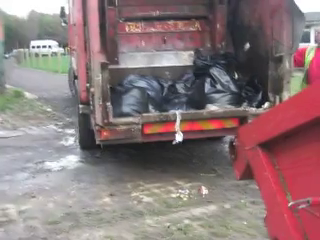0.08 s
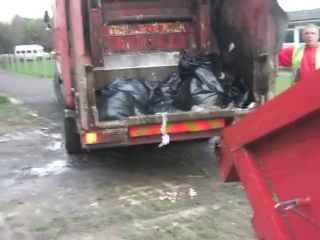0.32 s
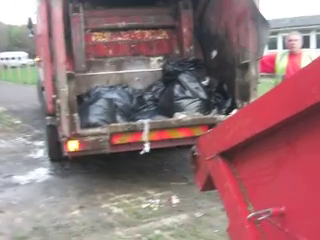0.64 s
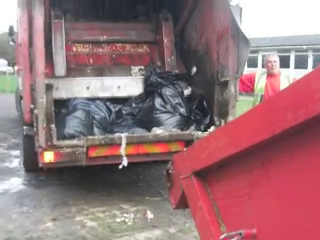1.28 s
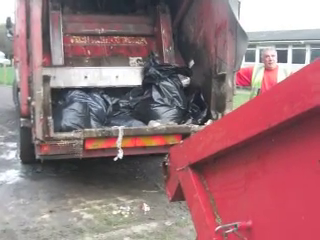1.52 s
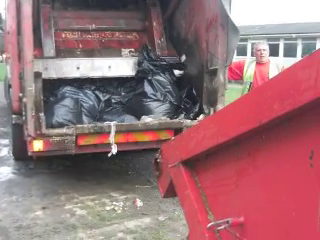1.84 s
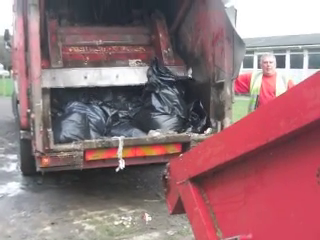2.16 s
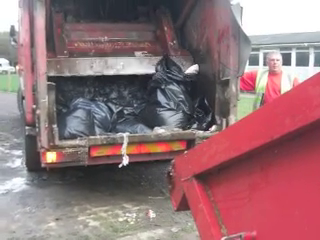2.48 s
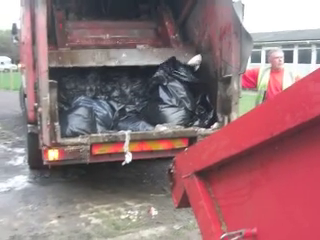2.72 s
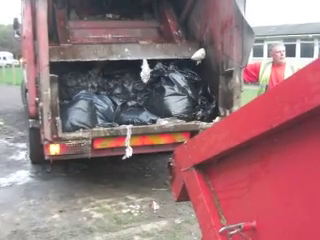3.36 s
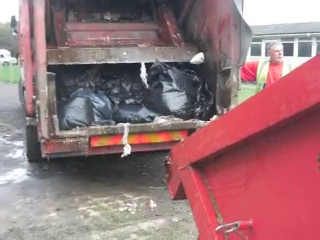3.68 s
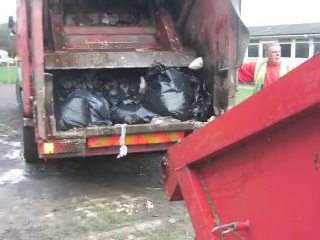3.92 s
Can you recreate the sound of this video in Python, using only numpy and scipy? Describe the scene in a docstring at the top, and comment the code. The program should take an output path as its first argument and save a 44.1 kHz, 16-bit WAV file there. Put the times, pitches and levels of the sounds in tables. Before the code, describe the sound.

A garbage truck runs close by outdoors, its diesel clattering under a wavering hydraulic whine. Near the end the compactor crushes rubbish bags with a quick cluster of crunches, metal bangs and scrapes, then a hiss rises.

```python
"""A refuse truck fades in outdoors: its diesel clatters at raised idle over a low rumble and
drives the whining hydraulic pump of the compactor. Near three seconds the packer blade crushes
through the load: the body shudders, the bags crunch, the steel hopper bangs and the blade scrapes.
The loudest bang overloads and ducks the level, which then creeps back up.
In the last half second oil hisses louder through the valves while engine and pump run on."""
import sys
import numpy as np
from scipy import signal
from scipy.fft import rfft, irfft
from scipy.io import wavfile
from scipy.ndimage import uniform_filter1d

SR = 44100
rng = np.random.default_rng(int(sys.argv[2]) if len(sys.argv) > 2 else 0)


def generate_wav(sig):
    """Save sig (samples, or channels by samples) to the path in sys.argv[1] as 16-bit PCM at SR."""
    pcm = np.round(np.clip(np.atleast_2d(sig).T, -1, 1) * 32767).astype(np.int16)
    wavfile.write(sys.argv[1], SR, pcm)


N = 176400
T = np.arange(N) / SR


def from_db(db):
    """Decibels to gain."""
    return 10 ** (np.asarray(db) / 20)


def rms_one(x):
    """Scale to rms 1."""
    return x / np.sqrt(np.mean(x ** 2) + 1e-20)


def in_time(rows):
    """Breakpoints to automation curves, one for each column after the time."""
    times, *columns = np.transpose(rows)
    return [np.interp(T, times, column) for column in columns]


def colour(noise, points):
    """EQ a noise through (f/Hz, level/dB) points, then scale to rms 1."""
    hz, db = np.transpose(points)
    bins = np.maximum(np.arange(N // 2 + 1) * SR / N, 1)
    eq = from_db(np.interp(np.log(bins), np.log(hz), db))
    return rms_one(irfft(rfft(noise) * eq, N))


def drift(rate_hz):
    """Smooth random modulation of rms about 1, rolling off above rate_hz."""
    size = N // 25 + 1
    bins = np.arange(size // 2 + 1) * SR / N
    slow = irfft(rfft(rng.standard_normal(size)) / (1 + (bins / rate_hz) ** 2), size)
    return np.interp(T, np.linspace(0, N / SR, size), rms_one(slow))


def ring(x, hz, t60):
    """One resonant mode: a unit click sets a sine of height 1 ringing."""
    radius = np.exp(-np.log(1000) / (t60 * SR))
    angle = 2 * np.pi * hz / SR
    return signal.lfilter([0, np.sin(angle)], [1, -2 * radius * np.cos(angle), radius ** 2], x + 1e-18)


def tone(turns, multiple, jitter_rad):
    """A harmonic of a rotation, rms 1, with an unsteady phase."""
    phase = 2 * np.pi * (multiple * turns + rng.random())
    return np.sqrt(2) * np.sin(phase + jitter_rad * drift(20))


def rumble():
    """The low bed: truck and load vibrate irregularly, swelling as the load gives way."""
    # rumble swell: t/s, level/dB
    swell = [(.14, -33.5), (2.96, -33.5), (3.0, -21), (3.09, -17), (3.19, -19.5), (3.26, -19.5),
             (3.4, -28.5), (4.0, -28.5)]
    # rumble colour: f/Hz, relative level/dB
    spectrum = [(20, -20), (45, 5.5), (80, -0.5), (280, -2), (600, -6), (2000, -38.5)]
    return from_db(in_time(swell)[0]) * colour(rng.standard_normal(N), spectrum)


def engine(cycles):
    """Diesel clatter comes round on every four-stroke cycle, with fresh noise, over the firing drone."""
    # drone partials: multiple of the cycle, level/dB
    partials = [(5, -46), (6, -33.5), (9, -46), (12, -38.5), (15, -43.5), (18, -44.5), (20, -46.5),
                (22, -45), (57, -50.5), (88, -49), (93, -45), (117, -50.5), (171, -47.5)]
    # clatter colour: f/Hz, relative level/dB
    spectrum = [(120, -23), (220, -2), (320, -5.5), (420, -17), (500, -4), (700, -4.5), (860, -5.5),
                (1000, -4.5), (1400, -4.5), (1900, -3), (2300, -9), (2950, -11.5), (3400, -7.5),
                (3750, -12.5), (4900, -18), (5600, -24.5)]
    # the clatter throbs with the turning parts: multiple of the cycle, depth/dB
    throbs = [(1, 0.27), (4, 0.82), (16, 1.0), (28, 0.8)]
    clatter_db, repeat_share = -26.5, 0.54
    cycle_samples = int(N / cycles[-1])
    fresh, pattern = rng.standard_normal((2, N))
    looped = np.interp(cycles % 1 * cycle_samples, np.arange(N), pattern)
    noise = np.sqrt(repeat_share) * looped + np.sqrt(1 - repeat_share) * fresh
    throb_db = sum(db * tone(cycles, k, jitter_rad=0.091) for k, db in throbs) / np.sqrt(2)
    drone = sum(from_db(db) * tone(cycles, k, jitter_rad=0.17) for k, db in partials)
    return from_db(clatter_db) * colour(noise * from_db(throb_db), spectrum) + drone


def pump(turns):
    """Pressure ripple in the pump makes a wavering harmonic whine and a high whistle."""
    # whine harmonics: t/s, then level/dB of harmonics 1, 2, 3, 6 and 12
    whine_levels = [(0.139, -23, -30.5, -46, -45, -55.5), (.4, -23, -35, -41.5, -31.5, -55),
                    (.62, -23.5, -31.5, -37, -31.5, -56), (.85, -23.5, -35, -35, -41.5, -51),
                    (1.1, -22.5, -31, -40.5, -43, -46), (1.75, -24.5, -31, -49, -42.5, -44.5),
                    (2.6, -25.5, -34, -44.5, -33.5, -45.5), (2.98, -24.5, -32, -38, -37, -49.5),
                    (3.45, -28, -41, -38.5, -39.5, -47), (3.8, -29, -32, -40.5, -42, -47)]
    # the whistle comes and goes: t/s, level/dB
    whistle_level = [(.25, -50), (.35, -36), (.45, -49.5), (1.15, -42), (1.45, -52), (3.35, -49.5),
                     (3.56, -37.5), (3.75, -51.5), (3.92, -37.5)]
    whine = np.zeros(N)
    for k, db in zip((1, 2, 3, 6, 12), in_time(whine_levels)):
        waver_db = np.sqrt(k) * drift(3.7)
        whine += from_db(db + waver_db) * tone(turns, k, jitter_rad=0.086 * k)
    whistle = from_db(in_time(whistle_level)[0]) * tone(turns, multiple=15, jitter_rad=.6)
    return whine + whistle


def oil_hiss():
    """Oil hisses through the valves, louder after the crush."""
    # hiss swell: t/s, level/dB
    swell = [(.14, -42), (2.9, -46.5), (3.3, -47.5), (3.55, -34.5), (4.0, -31.5)]
    # hiss colour: f/Hz, relative level/dB
    spectrum = [(500, -26), (1500, -10.5), (2600, -6.5), (3400, 4.5), (4000, -4.5), (4700, -1.5),
                (5700, -18)]
    return from_db(in_time(swell)[0]) * colour(rng.standard_normal(N), spectrum)


def hopper_echo(x):
    """The open steel hopper adds a short diffuse tail to the dry sound."""
    wet_db, t60 = -9, 0.68
    tail = rng.standard_normal(N) * np.exp(-np.log(1000) * T / t60)
    tail /= np.sqrt(np.sum(tail ** 2))
    return x + from_db(wet_db) * signal.fftconvolve(x, tail)[:N]


def shudder():
    """Jolts shake the low modes of the truck's body; a longer contact gives a softer thud."""
    # jolts: t/s, level/dB, contact time/s
    jolts = [(2.986, -15.5, 0.0025), (3.052, -23.5, .001), (3.125, -21, .0018), (3.229, -19, 0.00046),
             (3.294, -19.5, 0.0026), (3.371, -22.5, 0.0012)]
    # body modes: f/Hz, gain/dB, t60/s
    modes = [(44.5, 3, 0.24), (74.4, -3, .14), (103.2, 4.5, 0.15), (190, 3.5, .1), (288, 9.5, 0.21)]
    force = np.zeros(N)
    for start, db, contact in jolts:
        force += from_db(db) * (T >= start) * np.exp(-np.abs(T - start) / contact) / (contact * SR)
    return sum((-1) ** k * from_db(db) * ring(force, hz, t60) for k, (hz, db, t60) in enumerate(modes))


def scrapes():
    """The blade rubs on steel: each stroke swells and dies in one narrow resonance."""
    # blade strokes: t/s, length/s, level/dB, f/Hz, bandwidth/Hz
    strokes = [(3.075, .042, -21, 4650, 258), (3.198, 0.14, -28.5, 2610, 260),
               (3.246, 0.046, -29, 4760, 297)]
    out = np.zeros(N)
    for start, length, db, hz, bandwidth in strokes:
        swell = np.sin(np.pi * np.clip((T - start) / length, 0, 1))
        t60 = np.log(1000) / (np.pi * bandwidth)
        out += from_db(db) * swell * rms_one(ring(rng.standard_normal(N), hz, t60))
    return out


def bangs():
    """Each blow crunches the bags and sets the steel hopper ringing; loose plates rattle its modes."""
    # blows: t/s, crunch level/dB, ring level/dB, attack/s, decay time constant/s, tilt/(dB per octave)
    blows = [(2.995, -18.5, -25.5, .012, 0.053, -0.5), (3.044, -6, -7.5, .008, .016, .5),
             (3.059, -14, -34, 0.0024, 0.037, 1), (3.080, -11, -23.5, .005, 0.037, -1.8),
             (3.212, -18.5, -27, .018, .04, -2.5), (3.250, -17, -23.5, .006, 0.029, 1.5)]
    # colour of the crushed load: f/Hz, relative level/dB
    crunch_colour = [(100, -15), (300, 5.5), (700, 4), (1400, 2), (2200, 0.5), (3400, -2), (4200, -6),
                     (4900, -11.5), (5800, -20)]
    # hopper modes: f/Hz, gain/dB, t60/s
    modes = [(295, -10, .14), (496, -4.5, .13), (552, 0, 0.39), (572.5, 3.5, 0.25), (777, -9, 0.33),
             (912, -11.5, 0.24), (1147, -8.5, .15), (1440, -9, .22), (2570, -19, 0.13), (3234, -11.5, 0.17),
             (3333, -3.5, .07), (4910, -12.5, 0.2)]
    pivot_hz, grain_db = 1000, 2.0
    rattle_rad, rattle_hz = 0.59, 44.7   # phase wobble at the pivot; higher modes get more
    out = np.zeros(N)
    grain = from_db(grain_db * drift(340))
    for start, crunch_db, _, attack, decay, tilt in blows:
        rise = np.clip((T - start) / attack, 0, 1)
        fall = np.exp(-np.maximum(T - start - attack, 0) / decay)
        spectrum = [(hz, db + tilt * np.log2(hz / pivot_hz)) for hz, db in crunch_colour]
        out += from_db(crunch_db) * rise * fall * colour(rng.standard_normal(N) * grain, spectrum)
    starts, _, ring_db, attacks, _, tilts = np.transpose(blows)
    peak_samples = ((starts + attacks) * SR).astype(int)
    for k, (hz, db, t60) in enumerate(modes):
        strikes = np.zeros(N)
        strikes[peak_samples] = from_db(db + ring_db + tilts * np.log2(hz / pivot_hz))
        wobble_s = rattle_rad * drift(rattle_hz) / (2 * np.pi * pivot_hz)
        out += (-1) ** k * np.interp(T + wobble_s, T, ring(strikes, hz, t60))
    return out


def scene():
    """Engine and pump, geared together, form the bed; the crush lands on top."""
    # pitch of the pump's whine: t/s, f/Hz
    pitch = [(.14, 265), (.45, 261.2), (1.1, 264.8), (1.55, 263.7), (3.0, 264.2), (3.3, 266.8),
             (3.85, 263.3), (4.0, 265.4)]
    ripples_per_engine_cycle = 24.34
    ripples = np.cumsum(in_time(pitch)[0]) / SR
    bed = engine(ripples / ripples_per_engine_cycle) + pump(ripples) + oil_hiss() + rumble()
    crush = hopper_echo(bangs() + scrapes() + shudder())
    return (bed + crush)[None]


def gain_control(x):
    """A compressor: loud moments duck the gain fast, and it recovers steadily."""
    threshold_db, slope = -14, 0.66
    attack_s, release_db_per_s = 0.011, 16
    level_db = 10 * np.log10(np.maximum(uniform_filter1d(x ** 2, size=441), 1e-12))
    duck_db = np.maximum(level_db - threshold_db, 0) * slope
    release_db = release_db_per_s * T
    held_db = np.maximum.accumulate(duck_db + release_db, axis=-1) - release_db
    pole = np.exp(-1 / (attack_s * SR))
    return x * from_db(-signal.lfilter([1 - pole], [1, -pole], held_db))


def record(dry):
    """Microphone bass loss, ducking, fade-in, a steep treble cut, overload and a last top cut."""
    # fade-in: t/s, gain/dB
    fade_in = [(.137, -19), (.22, -12.5), (.33, -5.5), (.58, 0)]
    start_s, clip_level = .137, .72
    low_cut_hz, treble_stop_hz, top_stop_hz = 36, 6829, 16000
    x = signal.sosfilt(signal.butter(2, low_cut_hz, "high", fs=SR, output="sos"), dry)
    x = gain_control(x) * from_db(in_time(fade_in)[0]) * (T >= start_s)
    x = signal.sosfilt(signal.cheby2(14, 80, treble_stop_hz, fs=SR, output="sos"), x)
    x = np.clip(x, -clip_level, clip_level)
    return signal.sosfilt(signal.cheby2(12, 70, top_stop_hz, fs=SR, output="sos"), x)


dry = scene()
out = record(dry)
generate_wav(out)
```